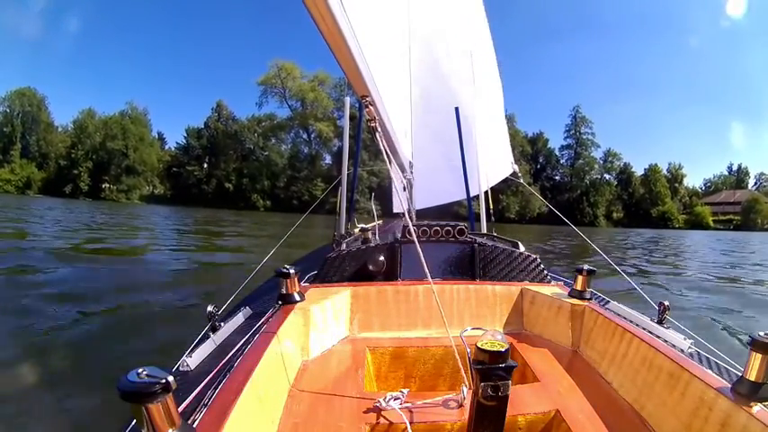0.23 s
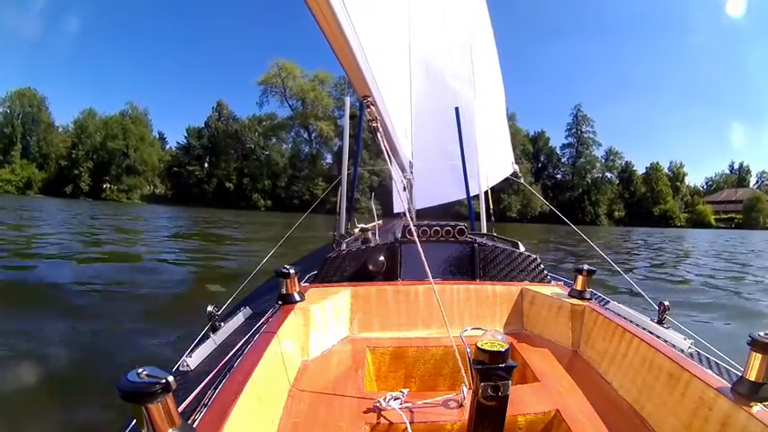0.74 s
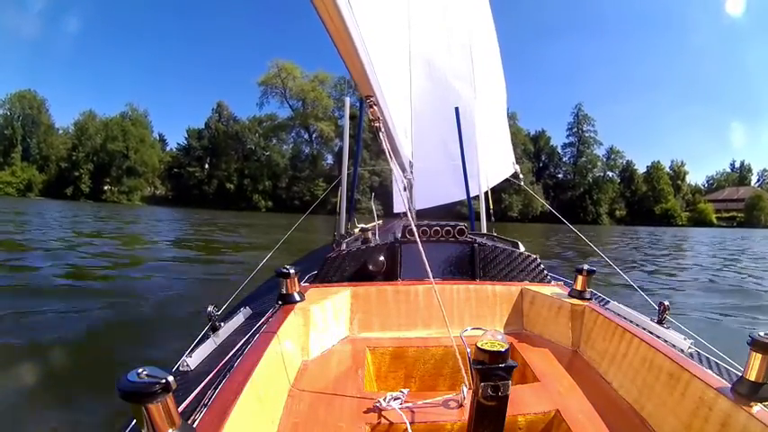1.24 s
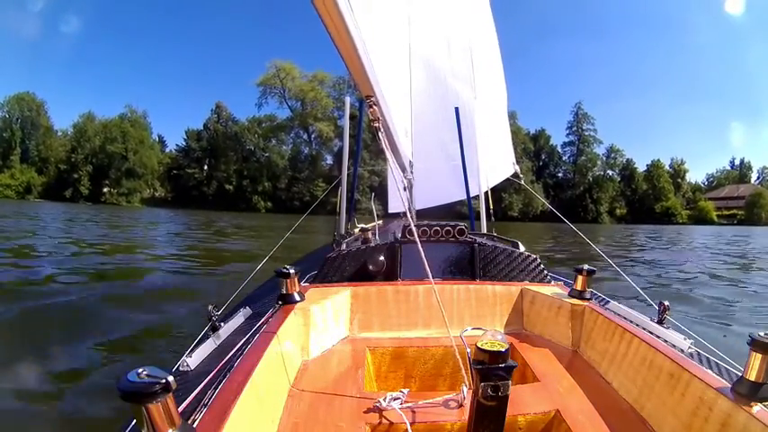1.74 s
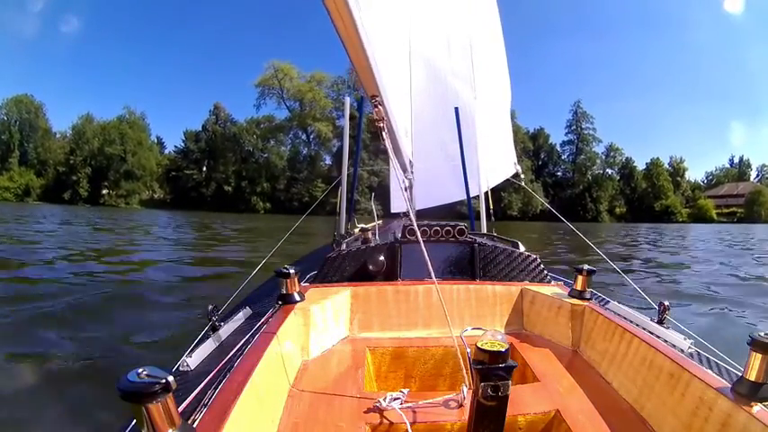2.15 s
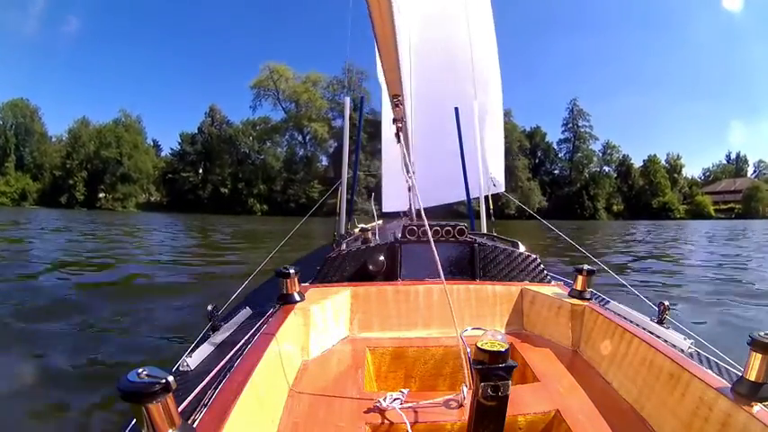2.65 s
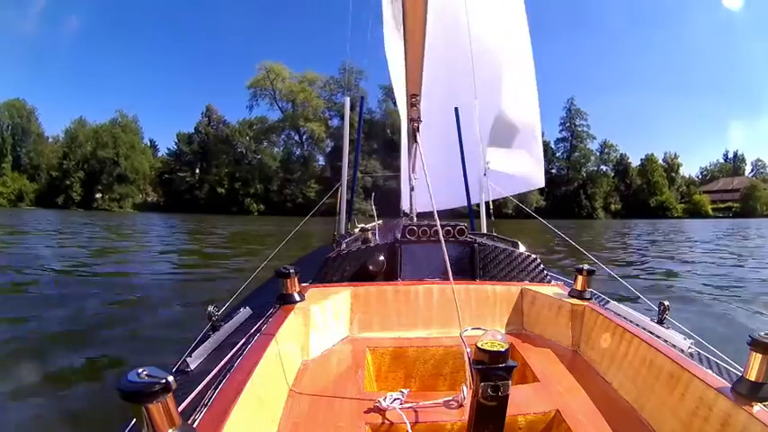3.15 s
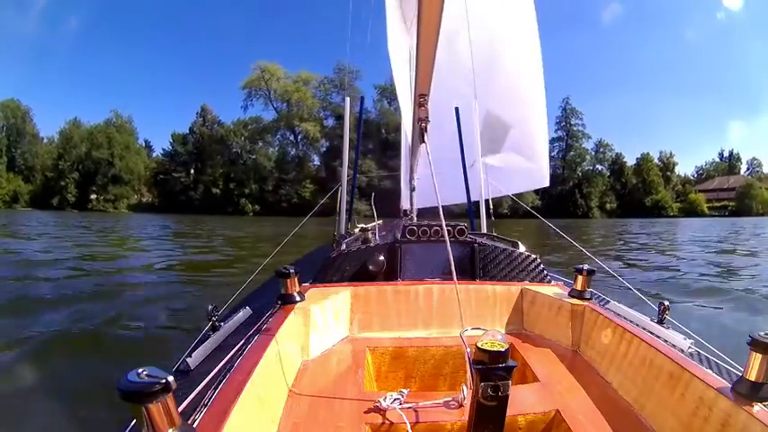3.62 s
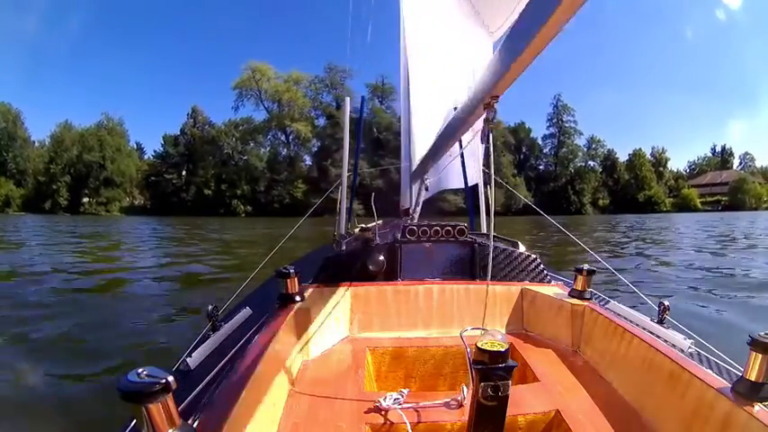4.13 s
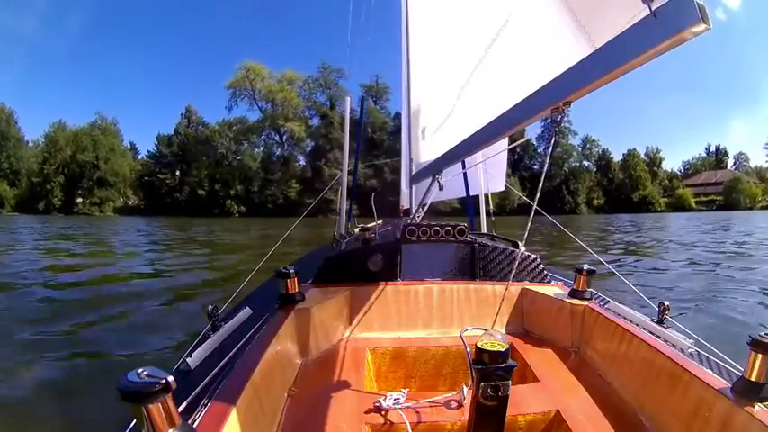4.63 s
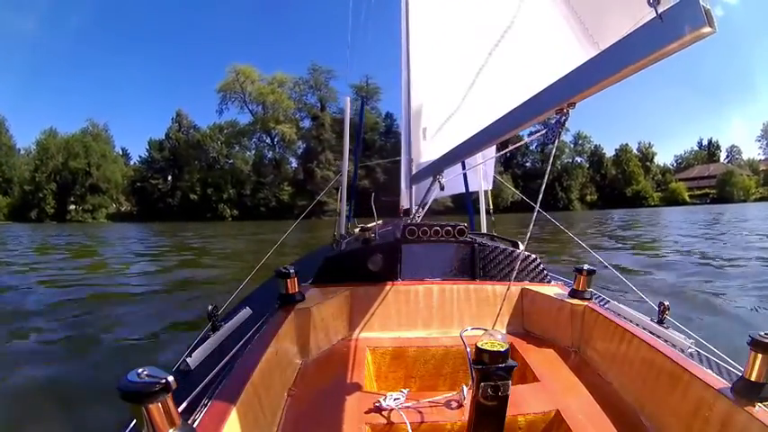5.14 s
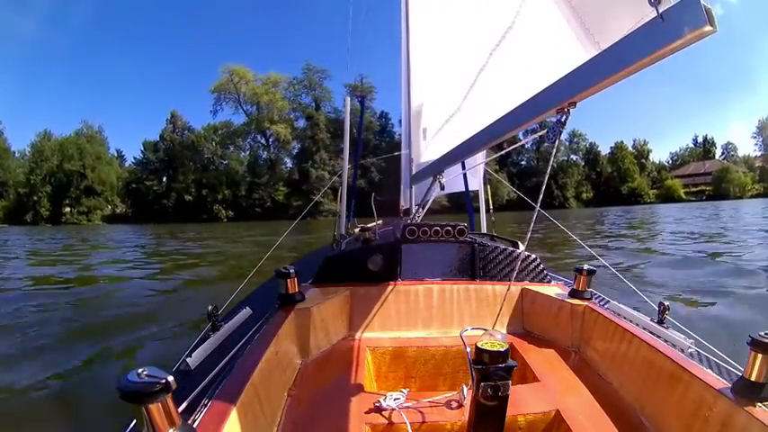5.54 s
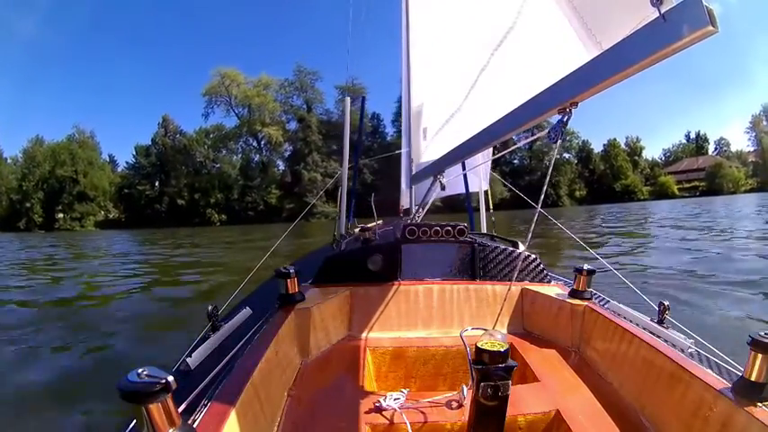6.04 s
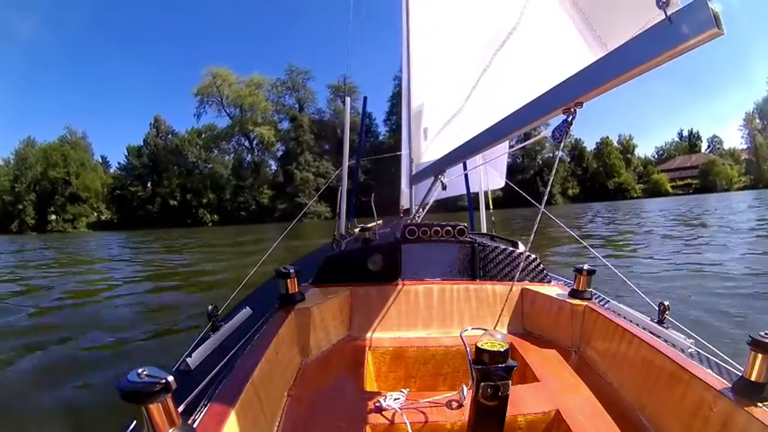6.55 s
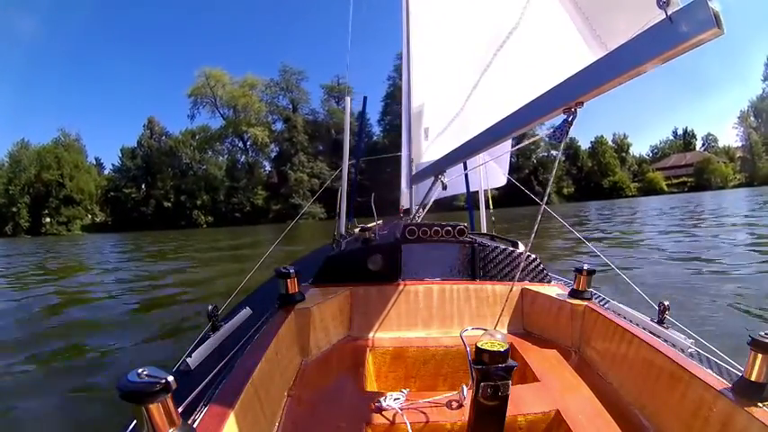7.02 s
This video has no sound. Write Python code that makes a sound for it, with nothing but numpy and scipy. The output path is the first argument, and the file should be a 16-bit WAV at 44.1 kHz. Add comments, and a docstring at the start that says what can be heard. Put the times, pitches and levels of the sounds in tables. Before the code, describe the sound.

Faint lake water laps a small hull; a geared servo rasps through a long haul, the sail snaps over, then twitches and two quick whirs follow.

```python
"""A model sailboat's sail winch heard on board, over a lake that washes the hull and laps its planks.
At 0.6 s comes a faint knock; from 2.0 s the geared servo hauls for 2.5 s, its teeth rasping,
the hull booming, the deck rattling and two wheels ticking once a turn; near full speed it whines.
At 3.9 s the sail swings over and snaps the sheet tight; from 4.6 s the servo twitches to hold it.
Fast runs follow at 6.2 s and 7.0 s. Teeth, hull and water are impulses, noise and tones in resonant bodies."""
import sys
import numpy as np
from scipy import signal
from scipy.fft import rfft, irfft, next_fast_len
from scipy.io import wavfile
from scipy.ndimage import map_coordinates

SR = 44100
rng = np.random.default_rng(int(sys.argv[2]) if len(sys.argv) > 2 else 0)


def pcm_store(signal):
    """Save signal as 16-bit PCM."""
    levels = np.round(np.clip(np.atleast_2d(signal), -1, 1) * 32767)
    wavfile.write(sys.argv[1], SR, levels.astype(np.int16).T)


N = 321048
T = np.arange(N) / SR  # s

# Wash along the hull. Each row: time in seconds, gain in dB.
WASH = [(0, -52.5), (1.0, -55), (7.28, -54.5)]
# Wavelets on the planks. Each row: start in seconds, relative level in dB.
LAPS = [(.029, -45.5), (0.193, -45.5), (0.311, -43), (.588, -44.5), (0.713, -47.5), (1.143, -47),
        (5.779, -64)]
# Colour of the water. Each row: frequency in Hz, relative density in dB.
LAKE_COLOUR = [(15, -47), (25, 0), (107, 1.5), (129, -3), (281, -3.5), (331, -7), (457, -11), (666, -13),
               (895, -14), (997, -15), (15500, -31.5)]
# Colour of the deck. Each row: frequency in Hz, relative density in dB.
DECK_COLOUR = [(100, -20), (165, -10), (210, -3.5), (260, 0.5), (310, -6.5), (370, -17), (420, -12.5),
               (520, -32), (900, -63.5)]
# Knocks of the rigging and hard clacks of the winch wheels. Each row: start in seconds,
# relative crack level in dB, relative thump level in dB.
KNOCKS = [(.583, -40, -58), (.588, -32.5, -57), (2.418, -26, -43), (2.502, -25.5, -62), (2.77, -26, -56),
          (2.907, -27.5, -59.5), (3.028, -22.5, -53), (3.238, -27, -70), (3.874, -16.5, -25),
          (3.876, -13.5, -22.5), (3.880, -24, -16.5), (3.886, -41, -16.5), (3.948, -66.5, -23),
          (4.985, -37.5, -50), (6.679, -40.5, -42), (7.088, -23, -45)]
# Colour of the cracks. Each row: frequency in Hz, relative density in dB.
CRACK_COLOUR = [(300, -10), (700, -14), (950, -9), (1250, 7), (1650, -3), (1950, 3.5), (2250, -19),
                (2550, -31), (3300, -16.5), (4100, -28), (6000, -46), (14000, -77)]
# Colour of the planks. Each row: frequency in Hz, relative density in dB.
PLANK_COLOUR = [(150, 0), (300, 0), (600, -0.5), (780, -7), (1000, -3), (1450, 2.5), (2000, -30),
                (2600, -15), (8000, -46)]
# Modes of the hull. Each row: frequency in Hz, mean level in dB, decay by 60 dB in seconds.
HULL_MODES = [(106, 2.5, 0.24), (205.5, -12, 0.199), (259.4, -4.5, 0.083), (318, -16, 0.043),
              (440, -33, 0.14), (643, -29, 0.17)]
# Short thumps with a burst of rasp: motor starts, twitches, a mid-run creak and the faint early knock.
# Each row: thump start in seconds, relative thump level in dB, relative rasp level in dB,
# Gaussian time constant of the rasp in seconds.
THUMPS = [(.589, -54, -49.5, 0.02), (2.022, -26, -44, 0.049), (3.425, -30, -32, 0.062),
          (4.582, -27.5, -50, 0.018), (4.767, -30, -51.5, 0.04), (4.879, -26.5, -49.5, 0.037),
          (4.983, -29, -56, 0.031), (5.084, -28, -49, .028), (5.221, -27, -42, 0.039),
          (5.335, -27.5, -39.5, 0.061), (5.419, -29.5, -41, 0.015), (5.52, -25, -49, .028),
          (5.623, -27.5, -56.5, 0.026), (5.921, -44.5, -58.5, 0.0255), (6.183, -27, -39.5, 0.21),
          (6.725, -27, -45, 0.058), (6.775, -31.5, -53, .028), (7.068, -44, -44, 0.057)]
# Colour of the gearbox. Each row: frequency in Hz, relative density in dB.
GEARBOX_COLOUR = [(350, -47.5), (520, -13), (780, -11), (930, -1.5), (1010, -3.5), (1190, 3), (1400, -1),
                  (1640, -10.5), (1870, -2.5), (2120, -5.5), (2310, -16.5), (2450, -35), (4300, -37),
                  (7000, -94), (15000, -92)]
# Colour of the servo's case. Each row: frequency in Hz, relative density in dB.
CASE_COLOUR = [(1800, -29), (2600, -17.5), (2970, 4.5), (3140, -6), (3360, 1.5), (3550, -8.5), (3760, 5),
               (4000, -24), (4140, 4), (4400, -14), (5800, -14.5), (7000, -54), (12000, -62.5)]
# Winch wheel, long haul. Each row: time in seconds, speed in turns per second.
HAUL = [(2.006, 0), (2.119, 26), (2.312, 40.1), (2.569, 30.4), (2.76, 21.2), (2.899, 23.5), (3.007, 37.4),
        (3.403, 25.5), (3.517, 15.6), (3.72, 16.6), (3.93, 12.9), (4.12, 18.6), (4.23, 12.8), (4.333, 29.6),
        (4.452, 20.2), (4.513, 0)]
# Winch wheel, first fast run. Each row: time in seconds, speed in turns per second.
SECOND_RUN = [(6.207, 0), (6.266, 42.1), (6.38, 44.8), (6.502, 42.2), (6.709, 0)]
# Winch wheel, last fast run. Each row: time in seconds, speed in turns per second.
THIRD_RUN = [(7.033, 0), (7.088, 24.9), (7.186, 43)]
# Small corrections of the sail. Each row: start in seconds, length in seconds, top speed in turns per second.
NUDGES = [(4.965, .05, 17.1), (5.215, .18, 19.3), (5.41, .06, 19.5), (6.71, .13, 17.4)]
# Motor current. Each row: on in seconds, off in seconds, gain in dB.
POWER = [(1.997, 5.13, -0.58), (5.201, 5.677, -2.5), (6.164, 6.842, -1), (7.048, 7.3, -1)]
# Pressure of the sheet on the teeth. Each row: time in seconds, rasp gain in dB.
LOAD = [(2.05, -0.5), (2.13, 2), (2.45, 1.5), (2.95, 1.5), (3.3, 2.5), (3.7, 3.5), (4.45, 3.5),
        (4.98, -4.5), (5.3, 1.5), (6.3, -.5), (6.6, -.5), (6.82, 1.5), (7.1, 2)]
# Tugs of the sheet. Each row: centre in seconds, half width to 1/e in seconds, peak boom gain in dB.
TUGS = [(3.084, 0.063, 7), (3.274, 0.043, 13), (4.325, 0.054, 6), (6.382, 0.048, 6), (6.59, 0.074, 9.5),
        (7.177, 0.09, 7)]
# Low rumble of the hull. Each row: frequency in Hz, relative density in dB.
RUMBLE_COLOUR = [(20, -22), (55, -16.0), (90, 21), (125, 10.0), (170, -4.0), (300, -60.5)]
# Lag of the second wheel behind the first. Each row: time in seconds, lag in turns.
TRAIL = [(2.35, 0.71), (2.7, 0.53), (3.03, 0.44), (3.3, .23), (3.7, 0.083), (4.45, 0.14), (5.0, 0.071),
         (6.25, .42), (6.56, 0.29), (7.28, 0.29)]
# Colour of the ticks. Each row: frequency in Hz, relative density in dB.
TICK_COLOUR = [(1500, -10), (2950, -34), (3900, -8), (4150, 9), (4450, -4.5), (5350, -8), (5830, 3),
               (6080, -12.5), (6300, -7.5), (6800, -21.5), (8100, -11), (9000, -18.5), (11400, -10),
               (12700, -43)]
# Motor tones. Each row: multiple of motor speed, relative level in dB.
ORDERS = [(5, -10), (6, -13), (7, -7), (11, 0), (16, -22), (22, -21)]

GEAR_RATIO, TEETH = 4.2, 11  # motor turns per wheel turn; teeth of the pinion
THUMP_S, PLANK_GRIT = .048, 5.3
POWER_ATTACK_S, POWER_RELEASE_S = 0.016, 0.039
CRUISE_TURNS_PER_S = 30
CREEP_TURNS_PER_S = 2.9  # the gears still fret while the servo holds
# levels at cruising pace and their growth with speed
RASP_DB, RASP_DB_PER_PACE_DB = -38, 1.3
BOOM_DB, BOOM_DB_PER_PACE_DB = -34, 0.48
RATTLE_DB, RATTLE_DB_PER_TURN_PER_S = -36, 0.32
SMOOTH_DB_PER_TURN_PER_S, SMOOTH_FROM_TURNS_PER_S = .7, 39
SWELL_TURNS_PER_S, SWELL_WIDTH_TURNS_PER_S = 15, 8
RASP_SWELL_DB, RASP_SWELL_LAG_TURNS = 1, -0.033
BOOM_SWELL_DB, BOOM_SWELL_LAG_TURNS = 6.5, .13
BOOM_HZ, BOOM_SAG_HZ = 101.1, 7.08  # the pitch sags at full speed
TICK_GAIN_DB, TICK_SCATTER_DB, TICK_T60_S = -15, 1.3, .011
TICK_FULL_TURNS_PER_S = 16  # slower wheels tick more softly
TICK_TREBLE_HZ, TICK_TREBLE_DB_PER_TURN_PER_S = 7500, 0.2
TICK_CASE_DB, THUMP_CASE_DB, RASP_CASE_DB = -17.5, -21.5, -22  # share of the servo's case
WHINE_GAIN_DB = -33.3
TOP_HZ = 15720


def amp(db):
    """Amplitude factor of a level in dB."""
    return 10 ** (np.asarray(db) / 20)


def unit(x):
    """x scaled to unit RMS."""
    return x / np.sqrt(np.mean(x ** 2) + 1e-20)


def curves(rows):
    """One value per sample for each column after the time."""
    s, *cols = np.transpose(rows)
    return [np.interp(T, s, c) for c in cols]


def noise():
    """White noise over the whole scene."""
    return rng.standard_normal(N)


def wobble(rate_hz):
    """A smooth random curve with rate_hz knots a second."""
    knots = rng.standard_normal(int(N * rate_hz / SR) + 4)
    return map_coordinates(knots, [T * rate_hz])


def filtered(x, response):
    """x times a complex response of frequency."""
    m = next_fast_len(N + SR // 2)
    return irfft(rfft(x, m) * response(np.fft.rfftfreq(m, 1 / SR)), m)[:N]


def coloured(x, points):
    """x through a causal, minimum-phase body of unit energy with the given (Hz, dB) colour."""
    size = 8192
    hz, db = np.transpose(points)
    log_hz = np.log(np.fft.rfftfreq(size, 1 / SR) + 1)
    gain = amp(np.interp(log_hz, np.log(hz), db))
    cepstrum = irfft(np.log(gain))
    cepstrum[1:size // 2] *= 2  # fold onto positive time
    cepstrum[size // 2 + 1:] = 0
    ring = irfft(np.exp(rfft(cepstrum)))
    return signal.fftconvolve(x, ring / np.linalg.norm(ring))[:N]


def passes(turns):
    """Samples at which a growing count reaches a whole number."""
    return np.flatnonzero(np.diff(np.floor(turns)) > 0)


def add(track, s, sound):
    """Mix a sound into the track at time s."""
    part = track[round(s * SR):][:len(sound)]
    part += sound[:len(part)]


def contact(t60, grit):
    """A hard touch of unit energy: one impulse and a dying scrape."""
    t = np.arange(SR // 20) / SR
    scrape = rng.standard_normal(len(t)) * amp(-60 * t / t60)
    touch = grit * scrape / np.linalg.norm(scrape)
    touch[0] += 1
    return touch / np.linalg.norm(touch)


def lake():
    """Water washes unevenly along the hull under a smooth, faint hiss; wavelets slap the planks."""
    water = unit(coloured(noise(), LAKE_COLOUR))
    low = filtered(water, lambda hz: 1 / (1 + (hz / 2500) ** 2))
    wash = low * amp(curves(WASH)[0] + 0.62 * wobble(20))
    hiss = (water - low) * amp(-56.5)
    slaps, t = np.zeros(N), np.arange(SR // 4) / SR
    envelope = (1 - np.exp(-t / 0.0043)) * np.exp(-t / 0.015)
    for s, db in LAPS:
        add(slaps, s, amp(db + 0.5) * envelope * rng.standard_normal(len(t)))
    return wash + hiss + coloured(slaps, DECK_COLOUR)


def hull_ring(t, hold_s):
    """The hull's modes, driven for hold_s and then dying exponentially."""
    ring = np.zeros(len(t))
    for hz, db, t60 in HULL_MODES:
        decay_db = 60 * np.maximum(t - hold_s, 0) / t60
        ring += amp(db + 1.8 * rng.standard_normal() - decay_db) * np.sin(2 * np.pi * hz * t)
    return ring


def knocks():
    """Rigging knocks and wheel clacks: a dry crack; the planks ring on, duller, and the hull answers."""
    cracks, planks, thumps = np.zeros(N), np.zeros(N), np.zeros(N)
    t = np.arange(SR // 2) / SR
    attack = 1 - np.exp(-t / 0.0028)
    for s, crack_db, thump_db in KNOCKS:
        add(cracks, s, amp(crack_db + 18.5) * contact(t60=.012, grit=.5))
        add(planks, s + 0.00192, amp(crack_db + 14.5) * contact(t60=0.059, grit=PLANK_GRIT))
        add(thumps, s, amp(thump_db) * attack * hull_ring(t, hold_s=0.0094))
    return coloured(cracks, CRACK_COLOUR) + coloured(planks, PLANK_COLOUR) + thumps


def rasping_thumps():
    """Short thumps of the hull's modes, each with a burst of rasp in gearbox and case."""
    thumps, grind = np.zeros(N), np.zeros(N)
    t = np.arange(SR // 4) / SR
    push = (1 - np.exp(-t / 0.0062)) * np.exp(-(t / THUMP_S) ** 3)
    for s, thump_db, rasp_db, length_s in THUMPS:
        add(thumps, s, amp(thump_db) * push * hull_ring(t, hold_s=0.012))
        envelope = (1 - np.exp(-t / 0.00056)) * np.exp(-(t / length_s) ** 2)
        add(grind, s - .008, amp(rasp_db) * envelope * rng.standard_normal(len(t)))
    case = amp(THUMP_CASE_DB) * coloured(grind, CASE_COLOUR)
    return thumps + coloured(grind, GEARBOX_COLOUR) + case


def current():
    """Gain of the motor: it switches on quickly, holds and dies away."""
    gain = np.zeros(N)
    for on_s, off_s, db in POWER:
        attack = np.clip((T - on_s) / POWER_ATTACK_S, 0, 1)
        gain += amp(db) * attack * np.exp(-np.maximum(T - off_s, 0) / POWER_RELEASE_S)
    return gain


def wheel_speed():
    """Turns per second of the winch wheel: three runs, and nudges that rise and fall as a half sine."""
    speed = sum(curves(run)[0] for run in (HAUL, SECOND_RUN, THIRD_RUN))
    for s, length_s, top in NUDGES:
        speed = speed + top * np.sin(np.pi * np.clip((T - s) / length_s, 0, 1))
    return speed


def pace_db(speed):
    """Speed of the gears, creep included, in dB over cruising speed."""
    return 20 * np.log10((speed + CREEP_TURNS_PER_S) / CRUISE_TURNS_PER_S)


def free_running(speed):
    """0 under load, 1 when the motor reaches full speed."""
    return np.clip((speed - 39.5) / 3, 0, 1)


def swell(turns, speed, lag_turns):
    """The wheel binds once a turn, most near SWELL_TURNS_PER_S: between -1 and 1."""
    depth = np.exp(-((speed - SWELL_TURNS_PER_S) / SWELL_WIDTH_TURNS_PER_S) ** 2)
    return depth * np.cos(2 * np.pi * (turns - lag_turns))


def rasp_level(turns, speed):
    """The rasp grows with speed and load and swells a little once a turn (dB)."""
    bind_db = RASP_SWELL_DB * swell(turns, speed, RASP_SWELL_LAG_TURNS)
    return RASP_DB + RASP_DB_PER_PACE_DB * pace_db(speed) + curves(LOAD)[0] + bind_db


def gears(turns, speed, rasp_db):
    """Loose, uneven pinion teeth strike and slide; the gearbox and the case ring with them."""
    motor = GEAR_RATIO * turns
    at = passes(TEETH * motor)
    tooth_samples = SR / (TEETH * GEAR_RATIO * np.maximum(speed[at], 10))
    # wear recurs every motor turn and slowly shifts: a comb of wavering, gliding tones
    wear = np.zeros(len(at))
    for k in range(1, TEETH // 2 + 1):
        wear += np.cos(2 * np.pi * k * motor[at] + wobble(8)[at] + rng.uniform(0, 2 * np.pi))
    chance = unit(rng.standard_normal(len(at)) * amp(1.47 * rng.standard_normal(len(at))))
    size = .2 + .95 * unit(wear) + chance
    strikes = np.bincount(at, unit(size) * np.sqrt(tooth_samples), N)
    sliding = unit(noise())
    meshing = speed / (speed + 8)
    # the pinion bites harder once a motor turn
    throb = unit(amp(2 * np.sin(2 * np.pi * motor) + 1.94 * wobble(70)))
    force = (np.sqrt(meshing) * strikes + np.sqrt(1 - meshing) * sliding) * throb * amp(rasp_db)
    # at full speed the teeth run smoother
    force *= amp(-SMOOTH_DB_PER_TURN_PER_S * np.maximum(speed - SMOOTH_FROM_TURNS_PER_S, 0))
    buzz_db = rasp_db + 0.22 * (speed - 33.5) + 2 * np.cos(2 * np.pi * turns) + 3.8 * wobble(140)
    buzz = noise() * amp(buzz_db)
    return coloured(force, GEARBOX_COLOUR) + amp(RASP_CASE_DB) * coloured(buzz, CASE_COLOUR)


def boom_level(turns, speed):
    """The boom grows with speed, swells once a turn and rises as the motor labours at each tug (dB)."""
    tugs_db = sum(db * np.exp(-((T - s) / half_s) ** 2) for s, half_s, db in TUGS)
    bind_db = BOOM_SWELL_DB * swell(turns, speed, BOOM_SWELL_LAG_TURNS)
    return BOOM_DB + BOOM_DB_PER_PACE_DB * pace_db(speed) + bind_db + tugs_db


def hull(turns, speed):
    """The working motor shakes the hull's lowest mode and rattles the deck."""
    boom_hz = BOOM_HZ - BOOM_SAG_HZ * free_running(speed)
    phase = 2 * np.pi * np.cumsum(boom_hz) / SR + 0.16 * wobble(25)
    boom = unit(np.sin(phase) * amp(1.1 * wobble(22)))
    rumble = unit(coloured(noise(), RUMBLE_COLOUR))
    shake = unit(coloured(noise(), DECK_COLOUR))
    unbalance = unit(np.sin(2 * np.pi * 7 * turns + .5 * wobble(30)))
    # the unbalance swells as it crosses the deck's resonance at 265 Hz
    deck_gain = 1.29 * np.exp(-((7 * speed - 265) / 45) ** 2)
    rattle = (shake + deck_gain * unbalance) / np.hypot(1, deck_gain)
    rattle_db = RATTLE_DB + RATTLE_DB_PER_TURN_PER_S * (speed - CRUISE_TURNS_PER_S)
    return amp(boom_level(turns, speed)) * (0.88 * boom + 0.5 * rumble) + amp(rattle_db) * rattle


def ticks(turns, speed, rasp_db):
    """Two wheels each catch once a turn, clacking in gearbox and case; the second drifts against the first."""
    touches, clacks = np.zeros(N), np.zeros(N)
    firmness = np.minimum(speed / TICK_FULL_TURNS_PER_S, 1)
    for wheel, db in (turns, -11.5), (turns - curves(TRAIL)[0], -13):
        for i in passes(wheel):
            touch_db = db + TICK_SCATTER_DB * rng.standard_normal()
            add(touches, T[i], firmness[i] * amp(touch_db) * contact(t60=TICK_T60_S, grit=2.6))
            clack_db = db + min(rasp_db[i], -36) + 28.5 + 5.1 * rng.standard_normal()
            add(clacks, T[i], amp(clack_db) * contact(t60=0.028, grit=1.0))
    snap = coloured(touches, TICK_COLOUR) * amp(TICK_GAIN_DB)
    treble = filtered(snap, lambda hz: hz ** 8 / (hz ** 8 + float(TICK_TREBLE_HZ) ** 8))
    # a faster wheel ticks brighter
    brightness = amp(TICK_TREBLE_DB_PER_TURN_PER_S * (speed - CRUISE_TURNS_PER_S))
    case = amp(TICK_CASE_DB) * coloured(clacks, CASE_COLOUR)
    return snap - treble + brightness * treble + coloured(clacks, GEARBOX_COLOUR) + case


def whine(turns, speed):
    """Motor tones near full speed; the wheel runs off centre and swells them once a turn."""
    wheel = 2 * np.pi * turns
    motor = GEAR_RATIO * wheel + .055 * wobble(120) + .06 * np.sin(wheel)
    tones = sum(amp(db + 2.5 * wobble(45)) * np.sin(k * motor) for k, db in ORDERS)
    return free_running(speed) * amp(WHINE_GAIN_DB) * unit(tones * (1 - .5 * np.cos(wheel)))


def scene():
    """Gears, hull and whine follow the motor current; the other layers are added ungated."""
    speed = wheel_speed()
    turns = np.cumsum(speed) / SR
    rasp_db = rasp_level(turns, speed)
    servo = gears(turns, speed, rasp_db) + hull(turns, speed) + whine(turns, speed)
    mix = lake() + knocks() + rasping_thumps() + current() * servo + ticks(turns, speed, rasp_db)
    return mix[None]


def record(dry):
    """The lowest bass is thinned and the sound ends at TOP_HZ."""
    return filtered(dry[0], lambda hz: (hz < TOP_HZ) * 1j * hz / (1j * hz + 22))[None]


dry = scene()
out = record(dry)
pcm_store(out)
```